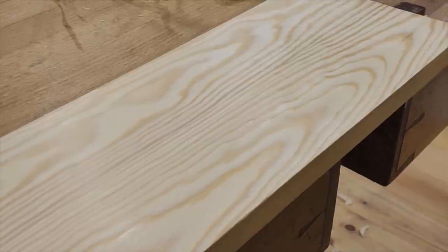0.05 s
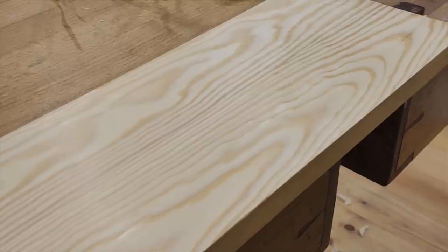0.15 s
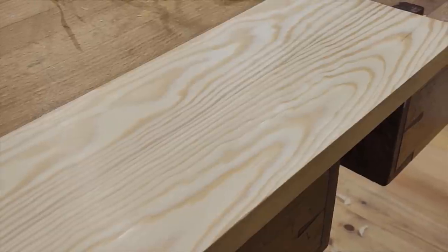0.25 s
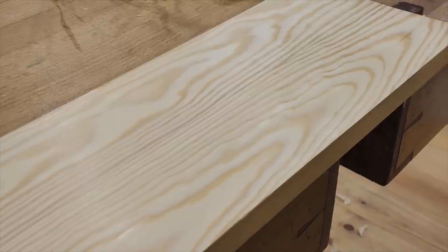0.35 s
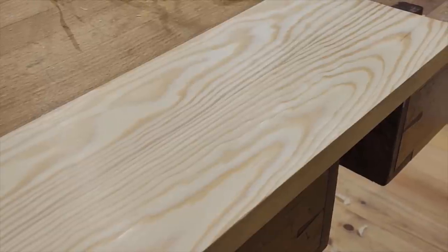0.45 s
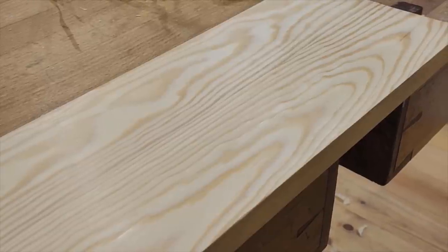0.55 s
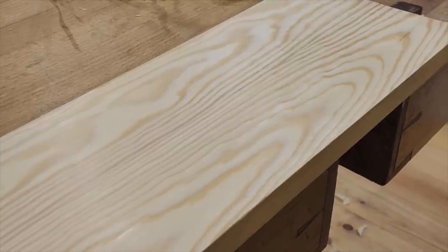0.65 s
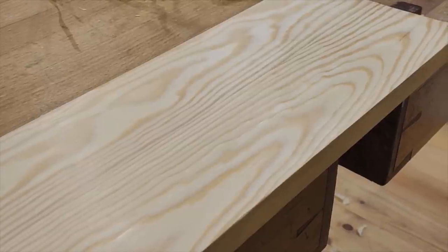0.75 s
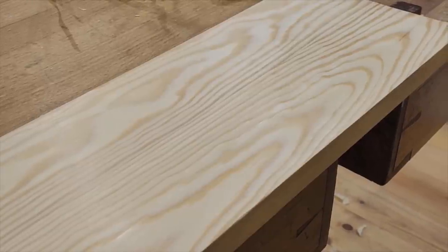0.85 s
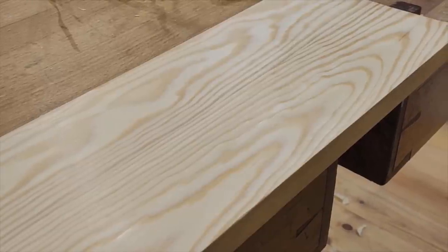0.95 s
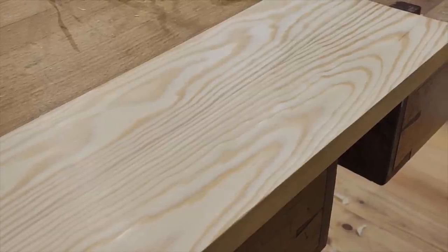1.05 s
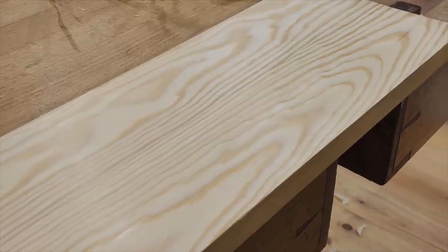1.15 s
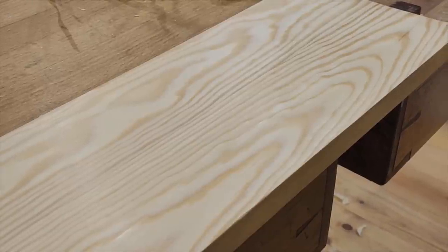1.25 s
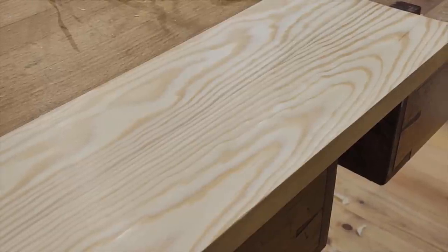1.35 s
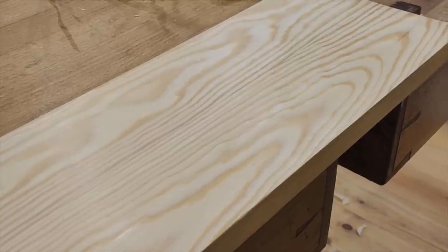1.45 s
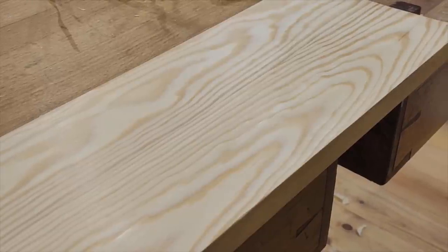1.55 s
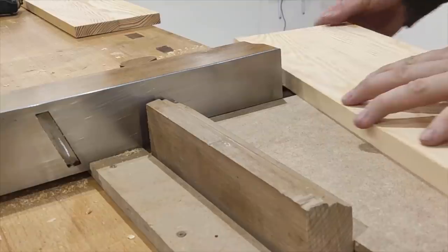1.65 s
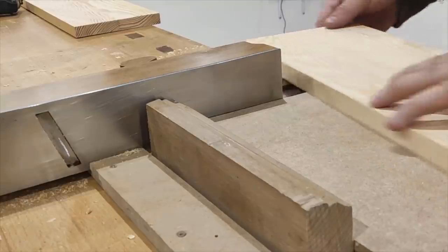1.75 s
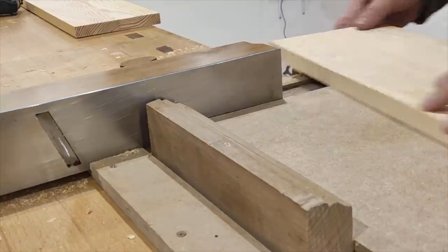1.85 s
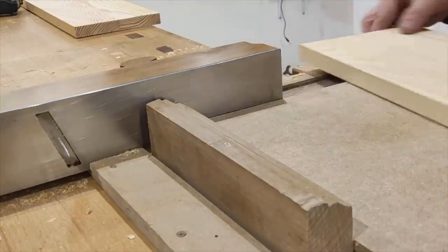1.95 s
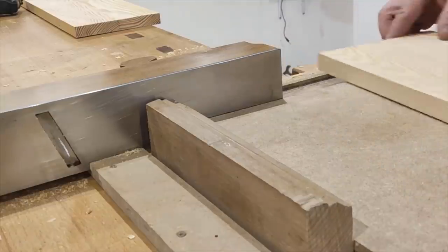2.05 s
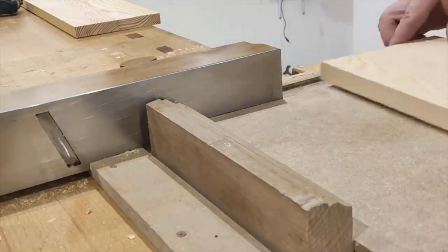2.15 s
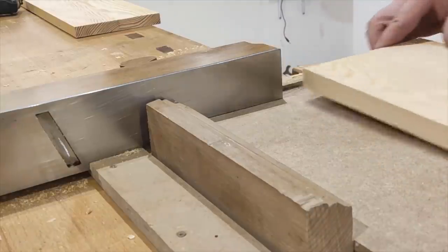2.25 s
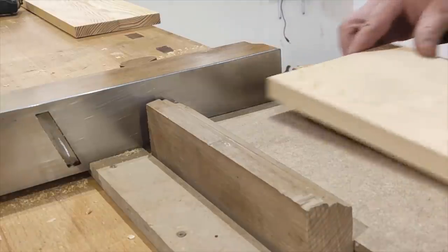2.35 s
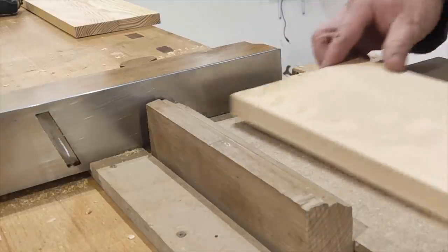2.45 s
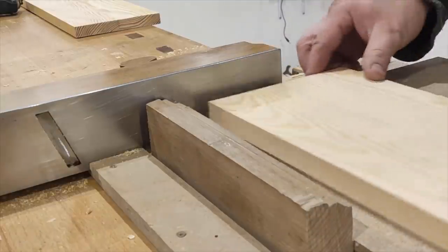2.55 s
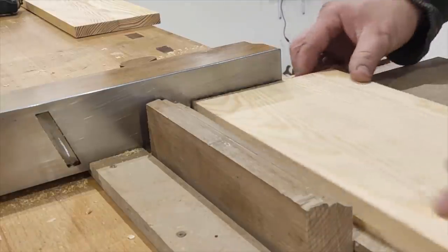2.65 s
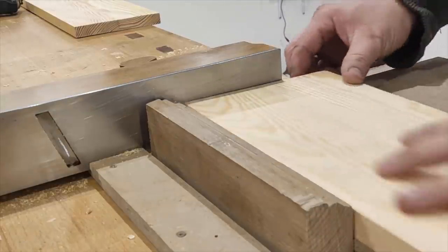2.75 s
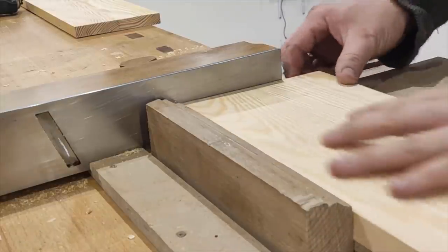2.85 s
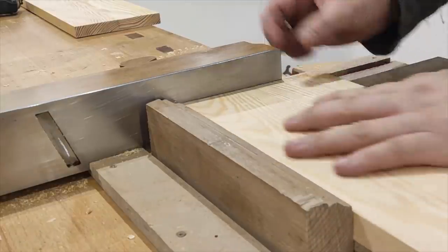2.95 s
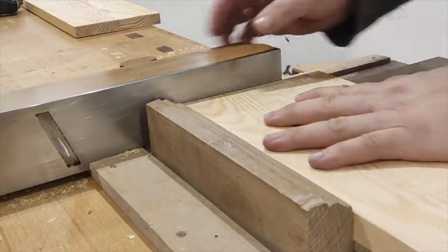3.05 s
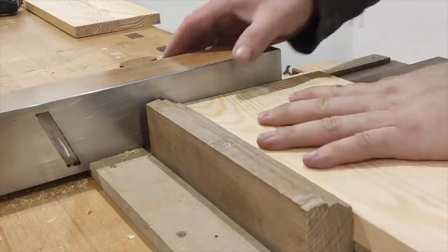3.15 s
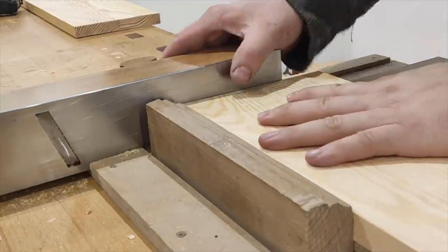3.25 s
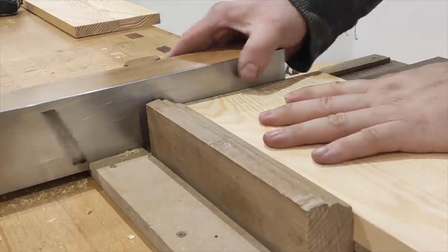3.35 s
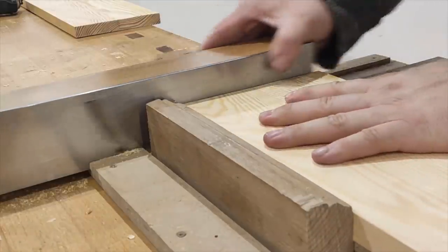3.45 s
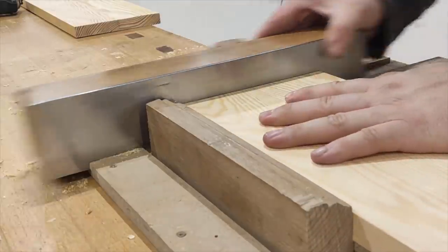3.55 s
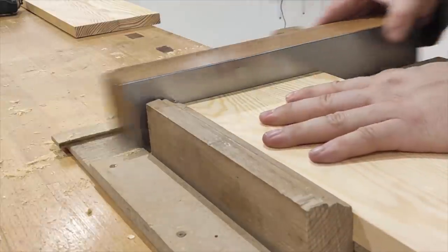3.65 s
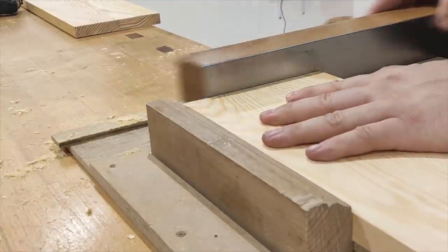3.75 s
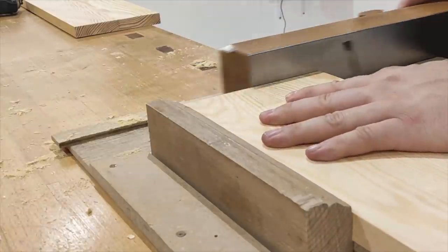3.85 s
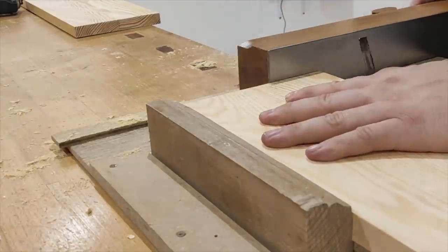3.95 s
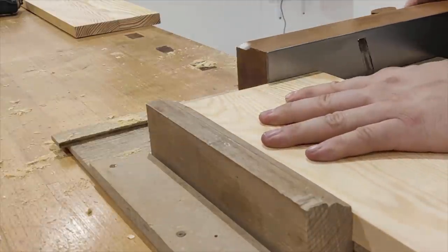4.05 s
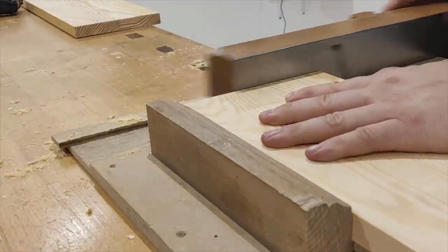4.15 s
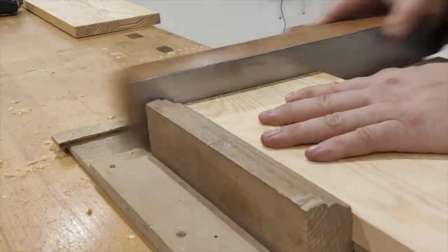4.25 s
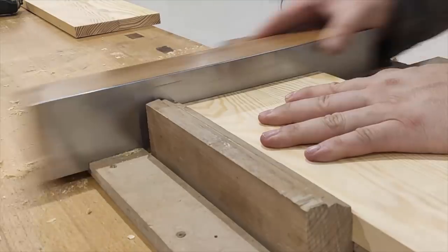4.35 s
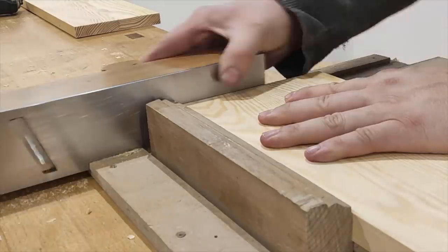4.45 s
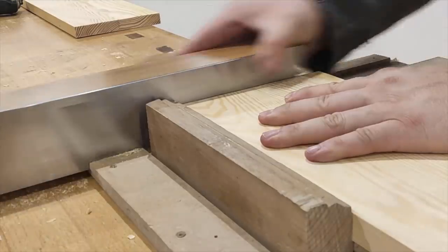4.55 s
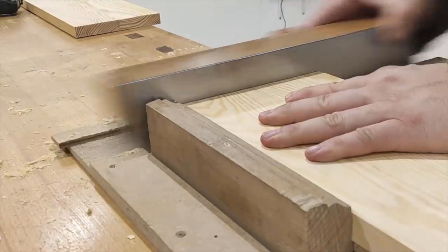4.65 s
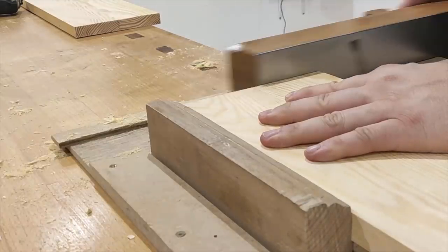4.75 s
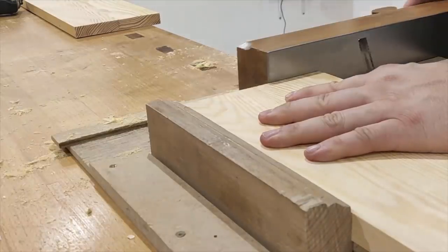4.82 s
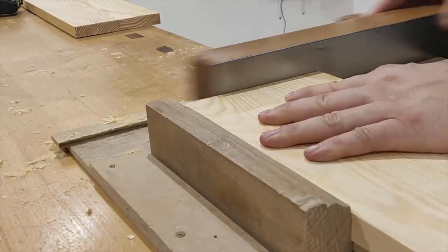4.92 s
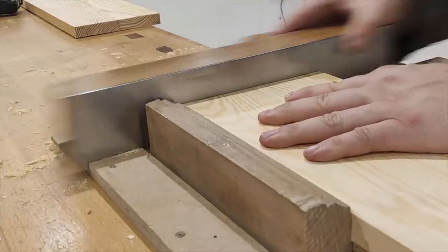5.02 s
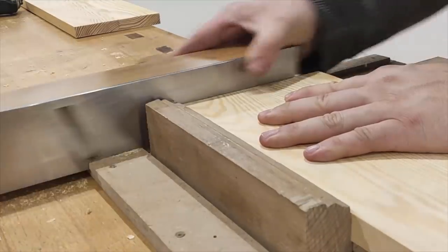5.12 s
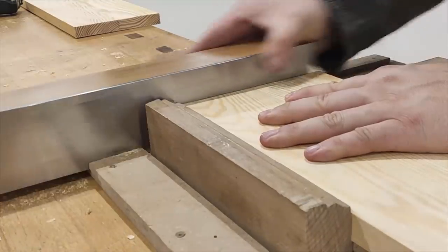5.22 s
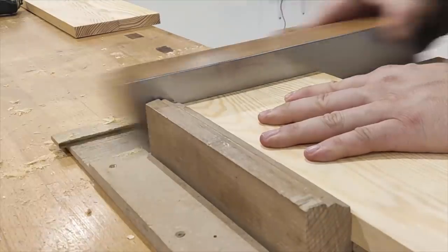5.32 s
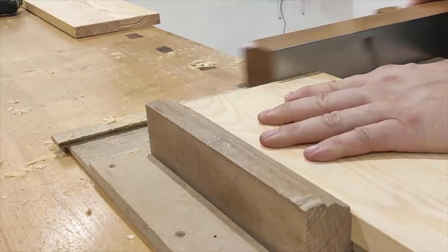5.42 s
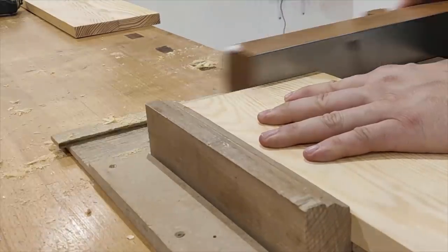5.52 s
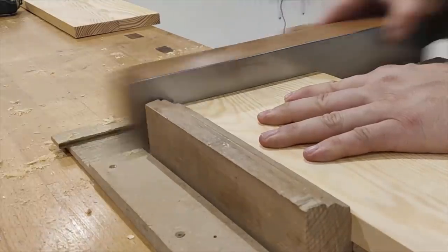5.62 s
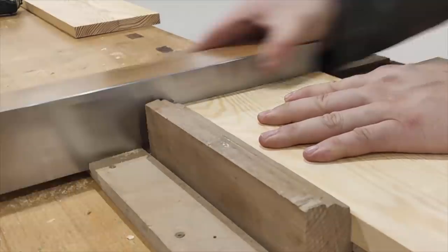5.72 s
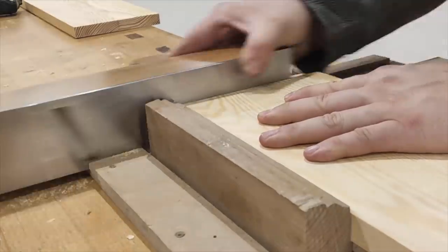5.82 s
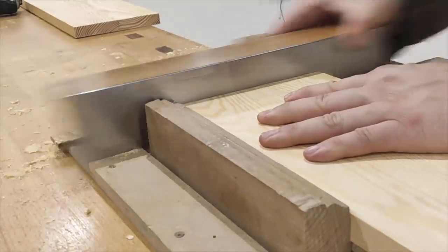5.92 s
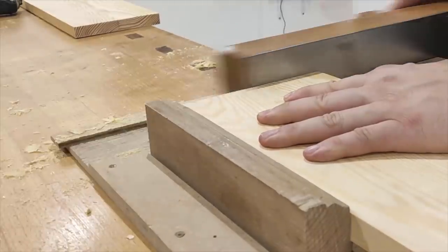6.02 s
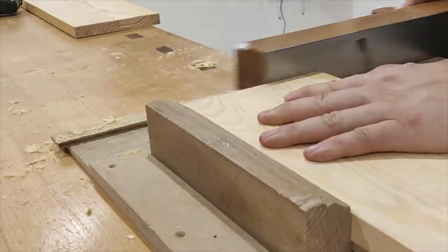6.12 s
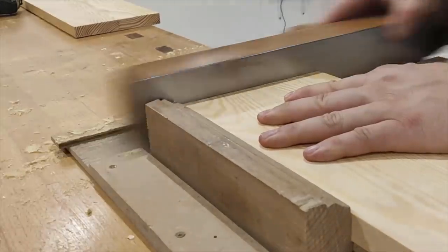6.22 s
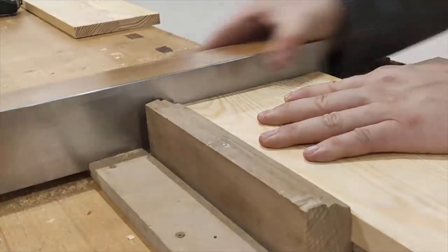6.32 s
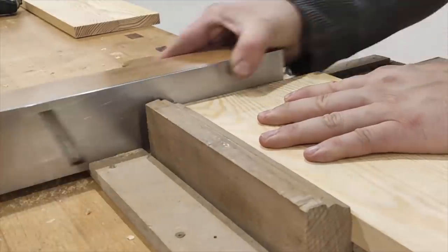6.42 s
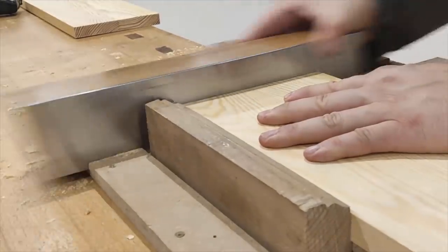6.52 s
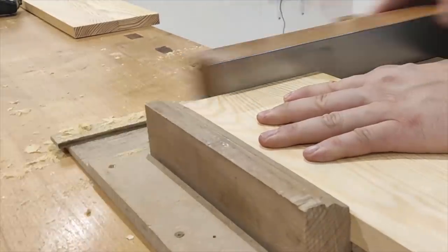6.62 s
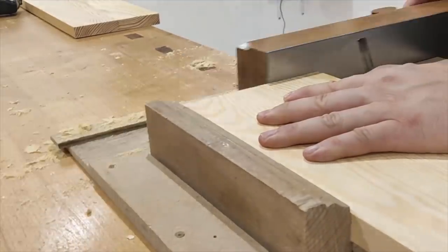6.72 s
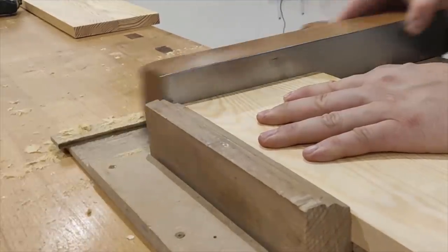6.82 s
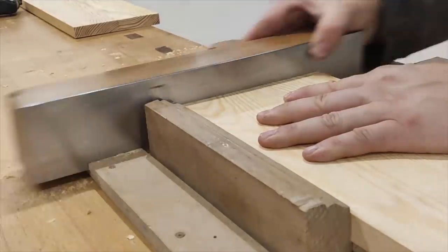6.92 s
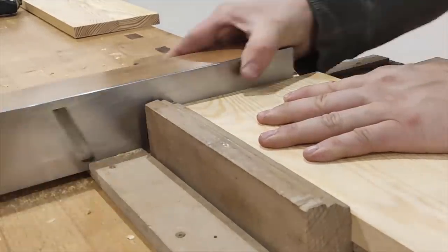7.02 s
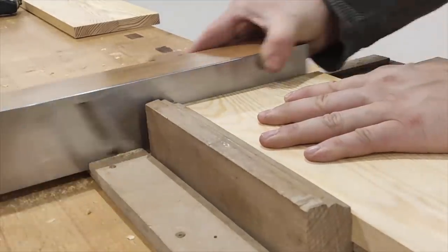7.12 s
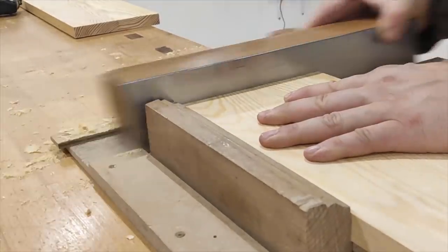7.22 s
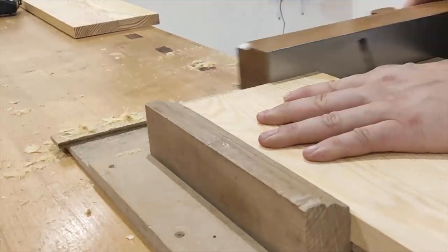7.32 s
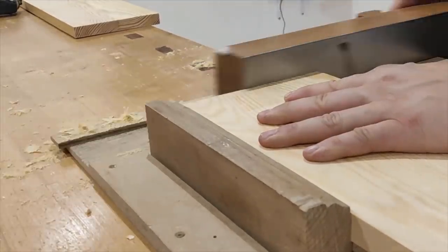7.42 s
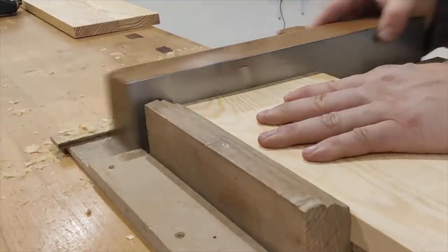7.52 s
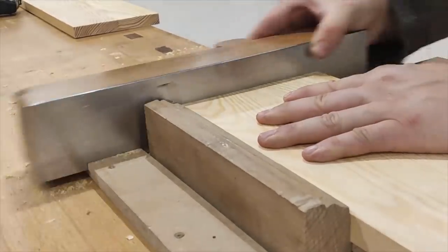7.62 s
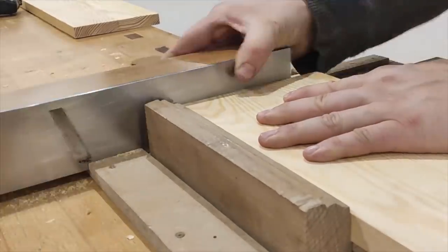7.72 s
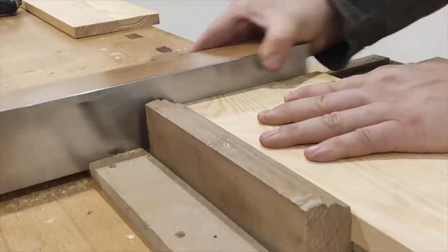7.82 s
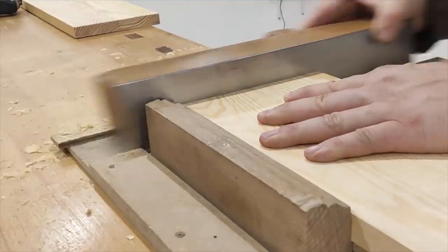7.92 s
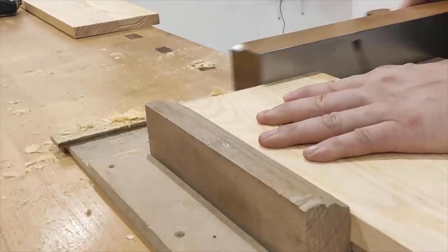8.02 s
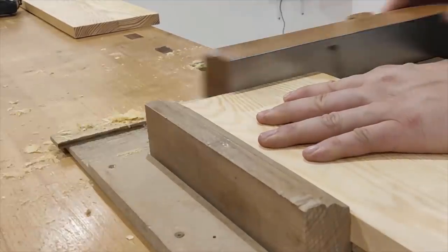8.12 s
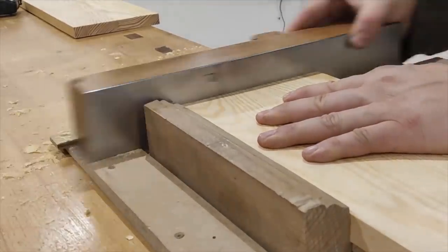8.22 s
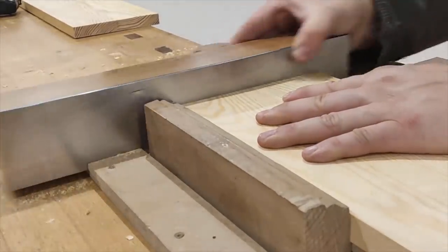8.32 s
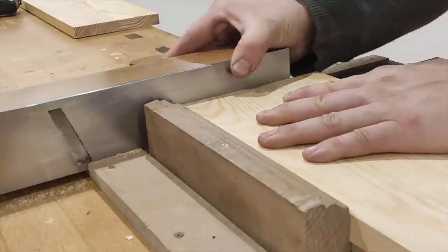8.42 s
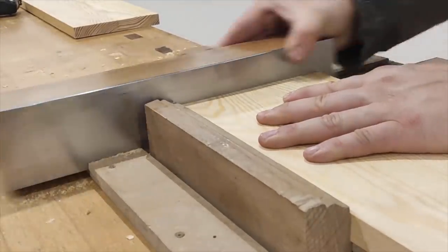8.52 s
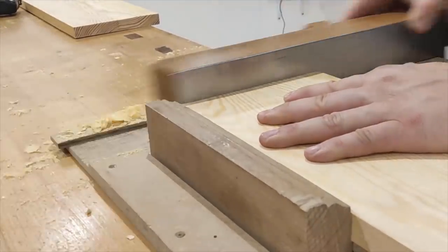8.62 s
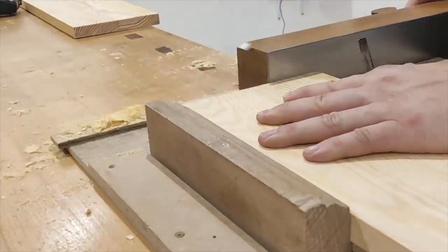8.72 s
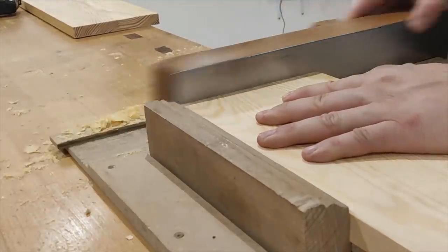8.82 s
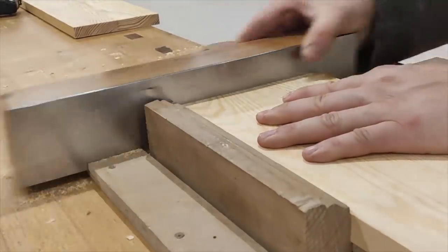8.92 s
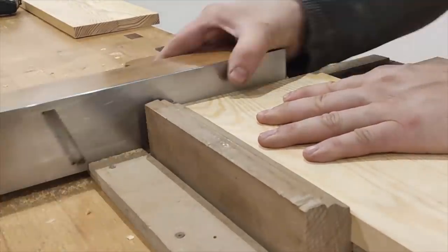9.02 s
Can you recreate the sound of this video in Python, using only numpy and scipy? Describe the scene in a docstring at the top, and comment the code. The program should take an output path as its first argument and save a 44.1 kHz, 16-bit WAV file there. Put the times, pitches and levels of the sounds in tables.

```python
"""A small workshop, saw and board close, in stereo: low rumble, mains hum and fan tones in still air.
First a board lands on the bench and slides to the fence of a bench hook: grains of friction, knocks of wood.
Then a back saw sets off: on each pull its teeth skate back and modes of the blade ring; on each push
a train of tooth snaps and tearing noise excites saw and board and shakes the bench.
Between strokes the blade rubs in the kerf and the hook rattles, until the last push runs out."""
import sys
import numpy as np
from scipy import signal
from scipy.fft import rfft, irfft
from scipy.io import wavfile
from scipy.ndimage import uniform_filter1d, minimum_filter1d

SR = 44100
rng = np.random.default_rng(int(sys.argv[2]) if len(sys.argv) > 2 else 0)


def store_pcm(level_fs):
    """Save levels as 16-bit WAV."""
    pcm = np.round(np.clip(level_fs, -1, 1) * 32767).astype(np.int16)
    wavfile.write(sys.argv[1], SR, np.atleast_2d(pcm).T)


N = 399987
T = np.arange(N) / SR

# Levels in the tables are relative: each layer has its own gain and colour on top.
# tones of mains hum and fan: pitch_hz, level_db
HUM_TONES = [(100, -57.5), (200, -59.5), (246, -65), (601, -80), (625, -70.5), (1966, -74.5)]
# colour of the workshop air: pitch_hz, level_db
AIR_COLOUR = [(15, -2.5), (36, 2.5), (55, -13.5), (150, -12), (300, -15.5), (450, -21.5), (700, -21),
              (1200, -31.5), (2000, -30.5), (4000, -37), (6500, -42.5), (8500, -58), (11000, -48.5),
              (16000, -45)]
AIR_DB = -51.5
ROOM_BASS_T60_S, ROOM_TREBLE_T60_S = 0.63, 0.28

# the board's weight lands on the bench top: start_s, thrum_db, sway_db
BOARD_LANDING = (1.664, -38.5, -44.5)
# board and fingers sliding: time_s, scrape_db, hiss_db
BOARD_SLIDE = [(1.68, -50, -62), (1.788, -43, -62), (1.932, -41, -53.5), (2.204, -46, -61),
               (2.314, -41.5, -51.5), (2.362, -36.5, -52.5), (2.65, -43, -64), (2.688, -45, -56),
               (3.012, -58, -53), (3.14, -55.5, -62.5)]
SLIDE_START_S, SLIDE_END_S = 1.664, 3.22
# the board knocking on hook and fence: start_s, level_db, softness_hz (low-pass corner of the contact)
BOARD_KNOCKS = [(1.664, -39, 2500), (1.694, -35, 1000), (2.575, -30.5, 1200), (2.599, -30.5, 2000),
                (2.745, -26, 1390), (2.784, -34, 700), (2.86, -33.5, 900), (2.91, -34.5, 1000),
                (3.502, -35.5, 6000), (3.823, -26.5, 380), (4.721, -36, 4000), (5.903, -34, 2500),
                (7.042, -29.5, 895)]
# the hook shifts on the bench: start_s, length_s, level_db
HOOK_SCUFFS = [(3.159, 0.041, -46), (3.275, 0.099, -44.5), (5.786, 0.059, -35.5), (6.42, 0.075, -40.5),
               (7.038, 0.044, -36), (7.155, 0.033, -42), (8.422, .09, -44)]

# the first pull and push are slow and feel for the line, when each sets off: start_s
FIRST_TURNS_S = [3.25, 3.98]
# the saw turns round this long before its teeth engage
PUSH_RUN_UP_S, PULL_RUN_UP_S = .07, 0.13
LAST_TURN_S = 9.2  # the last push runs out
# the arm's effort as the sawing gets under way: time_s, effort_db
ARM_EFFORT = [(3.3, -4.5), (4.3, -5.5), (5.5, 0.5), (9, 0.5)]
# pull strokes: start_s (teeth catch), swell_s, catch_db, drag_db, peak_db (hardest contact), treble_db,
# ring_hz, ring_db, bench_shake_db, rise_s (from the catch to the hardest contact)
PULL_STROKES = [(3.797, 0.017, -42, -37.5, -34, -20, 2097, -41.5, -47, 0.019),
                (4.672, 0.0022, -35, -43, -17, -6.5, 2396, -23.5, -46, .088),
                (5.334, 0.0076, -31.5, -42.5, -18.5, 3.5, 2540, -22.5, -40, 0.081),
                (5.964, .016, -26, -48, -21, 4, 2600, -31, -36.5, .088),
                (6.586, 0.017, -22.5, -46, -20.5, 4, 2365, -27, -34.5, 0.087),
                (7.243, 0.014, -25, -32, -18.5, 2.5, 2336, -23, -34.5, .087),
                (7.947, .013, -29, -24.5, -23, 1, 2130, -21.5, -36.5, .088),
                (8.616, 0.041, -26, -27, -24, 3, 2430, -33, -31.5, 0.09)]
# push strokes: start_s (teeth bite), bite_s (length), bite_db, cut_s (length), cut_db,
# cut_treble_db, woody_body_db, bench_sway_db, bench_shake_db
PUSH_STROKES = [(4.248, 0.015, -19.5, 0.025, -24, -13, 4, -42.5, -45),
                (4.984, 0.021, -17, .058, -24, -0.5, 6, -35.5, -39.5),
                (5.619, 0.01, -13.5, 0.062, -23.5, 0.5, 1.5, -32, -35),
                (6.232, 0.028, -15.5, 0.063, -25.5, 9.5, 5, -27.5, -29),
                (6.85, 0.024, -13.5, 0.088, -19.5, 1.5, -1, -29.5, -31),
                (7.512, 0.023, -16, 0.18, -22.5, 5, 3, -32, -33.5),
                (8.199, 0.035, -11, 0.13, -24, 12, 3, -38, -31),
                (8.864, 0.011, -8.5, 0.092, -24, 11.5, 0.5, -34, -32)]
# the teeth snag once more near the end of a push: start_s, length_s, level_db
PUSH_SNAGS = [(5.095, 0.0071, -29), (5.727, 0.0069, -15), (6.326, 0.0093, -18.5), (6.959, 0.02, -19),
              (7.645, 0.028, -20.5), (8.28, 0.026, -23)]

# colours of bench sway, bench-top thrum and hook rattle: pitch_hz, level_db
SWAY_COLOUR = [(15, -18), (35, -17.5), (50, 4.5), (66, -1), (90, -9), (200, -51.5)]
THRUM_COLOUR = [(70, -29), (120, -1.5), (170, 1), (215, -5.5), (290, -5), (400, -18), (800, -50)]
HOOK_COLOUR = [(150, -18.5), (350, -4), (480, 6), (640, -0.5), (900, -1), (1200, -4), (1700, -19),
               (3000, -37)]
# colours of board scrape, kerf rub, skating pull and cutting push: pitch_hz, level_db
BOARD_COLOUR = [(120, -41), (200, -15), (409, -26), (465, -11), (763, -10.5), (968, 1), (1300, -3.5),
                (1450, -1), (1680, -1), (5940, -8), (8420, -25), (13800, -31), (16000, -32)]
KERF_COLOUR = [(150, -29.5), (500, -4.5), (1200, -7.5), (2500, -9.5), (4500, -12), (6500, -13.5),
               (8500, -23), (11000, -22.5), (16000, -27.5)]
SKATE_COLOUR = [(70, -21), (140, -6.5), (450, 1.5), (700, -13), (1150, -4.5), (1500, 5), (1800, 0),
                (2500, 5), (3300, -2.5), (4300, 0), (6500, -9.5), (8500, -19), (11000, -17.5), (16000, -27)]
CUT_COLOUR = [(71, -50.5), (120, -7.5), (157, -11.5), (278, -6.5), (727, -12.5), (1400, 0), (2640, -3),
              (2930, -1), (3450, -5.5), (4320, 0), (5080, -4.5), (6500, -7.5), (8480, -15.5),
              (10600, -11.5), (16000, -18)]
# colours of the slide's hiss, the knocks and their thud: pitch_hz, level_db
HISS_COLOUR = [(1000, -7.5), (6000, 3.5), (8500, -6.5), (11000, -4), (16000, -11)]
KNOCK_COLOUR = [(60, -11), (250, 1.0), (700, 5.5), (1500, -2.5), (5000, -3), (16000, -35)]
THUD_COLOUR = [(100, -20), (200, 0), (380, -7.5), (800, -32.5)]
# resonances of the scraped board and the thud: pitch_hz, width_hz, level_db
SCRAPE_MODES = [(664, 50, 7.5), (940, 73, -9), (1444, 24, 7), (1600, 92, -3.5)]
THUD_MODES = [(276.5, 8.1, 15.4), (365, 31, 8.4)]
# resonances of the board on its hook: pitch_hz, width_hz, level_db
BOARD_MODES = [(165, 12, 6), (266.4, 15, 5.5), (337, 51, 6.5), (470, 54, -13.5), (705, 81, 0.5),
               (914, 27, -48), (1460, 81, 5)]
# resonances of saw and board under the teeth: pitch_hz, width_hz, level_db
SAW_MODES = [(165, 18, 6.5), (275, 11, -2), (492, 23, -24), (856, 175, 2), (1474, 105, -6.5), (2155, 88, 0),
             (2970, 480, -6), (3280, 72, -3), (3590, 82, -2), (4210, 104, -3), (4690, 150, -12),
             (5500, 150, -8), (6410, 480, -6), (6700, 170, -8)]
# outer modes of the blade: pitch_hz (before bend and flutter), level_db, t60_s
OUTER_BLADE_MODES = [(1500, 0, 0.11), (3140, 0, 0.2)]
BLADE_LONGEST_T60_S = .4  # in the central cluster
TOP_HZ = 16000


def undb(db):
    """Decibels to gain."""
    return 10 ** (np.asarray(db) / 20)


def unit(x):
    """Scale to rms 1."""
    return x / np.sqrt(np.mean(x ** 2))


def curve(rows, axis=1):
    """Gain over time from a column of dB values."""
    rows = np.array(rows)
    return undb(np.interp(T, rows[:, 0], rows[:, axis]))


def walk(rate_hz):
    """Slow random wander with rms 1."""
    knots = rng.standard_normal(int(N / SR * rate_hz) + 2)
    return unit(np.interp(T * rate_hz, np.arange(len(knots)), knots))


def envelope(start, hold, attack_s, release_s):
    """Straight attack, exponential release beginning at the hold time, counted from the start."""
    out, i = np.zeros(N), int(start * SR)
    t = T[:min(N - i, SR)]
    out[i:i + len(t)] = np.minimum(t / attack_s, 1) * np.exp(-np.maximum(t - hold, 0) / release_s)
    return out


def lowpass(x, hz, order=2):
    """Butterworth low-pass."""
    return signal.sosfilt(signal.butter(order, min(hz, .45 * SR), fs=SR, output="sos"), x)


def ring(x, response):
    """Pass a sound through a response."""
    return signal.oaconvolve(np.atleast_2d(x), np.atleast_2d(response), axes=1)[:, :N]


def body(colour, modes=(), size=8192):
    """Causal response of unit energy: resonances standing on a broad colour."""
    f = np.arange(size // 2 + 1) * SR / size + 1
    hz, db = np.transpose(colour)
    gain = undb(np.interp(np.log(f), np.log(hz), db))
    gain = gain * np.sqrt(1 + sum(undb(d) ** 2 / (1 + (2 * (f - c) / w) ** 2) for c, w, d in modes))
    # folding the cepstrum gives minimum phase
    cepstrum = irfft(np.log(gain))
    cepstrum[1:size // 2] *= 2
    cepstrum[size // 2 + 1:] = 0
    h = irfft(np.exp(rfft(cepstrum)))
    return h / np.linalg.norm(h)


def spread(x, split_hz=900):
    """Turn middle and side into left and right; bass reaches both alike, treble comes by unlike paths."""
    side = x[1] - lowpass(x[1], split_hz, order=1)
    return np.array([x[0] + side, x[0] - side]) / np.sqrt(2)


def grains(rate, spread_db):
    """Tiny slips and snaps at random moments (rate per second), random in size and unlike in two channels."""
    sizes = undb(spread_db * np.minimum(rng.exponential(size=N), 4))
    return unit((rng.random(N) < rate / SR) * sizes * rng.standard_normal((2, N)))


def background():
    """Still workshop air as coloured noise with a low rumble, and steady hum tones with wandering phase."""
    air = unit(spread(ring(rng.standard_normal((2, N)), body(AIR_COLOUR))))
    hum = sum(undb(db) * np.sqrt(2) * np.sin(2 * np.pi * hz * T + 0.27 * walk(8.5)) for hz, db in HUM_TONES)
    return undb(AIR_DB) * air + hum


def room(x, wet_db=-9, delay_s=0.01):
    """The workshop's walls return a short tail whose treble dies first."""
    t = T[:SR * 3 // 4]
    noise = rng.standard_normal((2, len(t)))
    low = lowpass(noise, 1800, order=1)
    tail = low * undb(-60 * t / ROOM_BASS_T60_S)
    tail += undb(-2.0) * (noise - low) * undb(-60 * t / ROOM_TREBLE_T60_S)
    tail = (tail - lowpass(tail, 310, order=1)) * (1 - np.exp(-(t / delay_s) ** 2))
    return undb(wet_db) * ring(x, tail / np.sqrt(np.sum(tail ** 2) / 2))


def travel(turn_db=-17):
    """Speed of the saw: it swells through each stroke and nearly stops at each turn."""
    turns = FIRST_TURNS_S + [row[0] - PUSH_RUN_UP_S for row in PUSH_STROKES[1:]]
    turns += [row[0] - PULL_RUN_UP_S for row in PULL_STROKES[1:]]
    turns = sorted(turns + [LAST_TURN_S])
    speed = np.abs(np.sin(np.pi * np.interp(T, turns, np.arange(len(turns)))))
    return (speed ** 0.63 + undb(turn_db)) * (T > turns[0])


def sliding(axis=1):
    """Strength of the board's slide from touch-down until it rests at the fence."""
    touch_down = np.clip((T - SLIDE_START_S) / 0.0055, 0, 1)
    come_to_rest = np.clip((SLIDE_END_S - T) / 0.1, 0, 1)
    return touch_down * come_to_rest * curve(BOARD_SLIDE, axis)


def shaking(push_db, pull_db, knock_db, slide_db, travel_db, attack_s, release_s):
    """Drive of a bench part: bites, catches and knocks die away over the steady drag of saw and board."""
    blows = [(s, cut_s, db + push_db) for s, _, _, cut_s, *_, db in PUSH_STROKES]
    blows += [(s, rise, db + pull_db) for s, *_, db, rise in PULL_STROKES]
    power = sum((undb(db) * envelope(s, hold, attack_s, release_s)) ** 2 for s, hold, db in blows)
    power += sum((undb(db + knock_db) * envelope(s, 0, attack_s, release_s / 2)) ** 2
                 for s, db, _ in BOARD_KNOCKS)
    slide = undb(slide_db) * sliding()
    drag = undb(travel_db) * travel() * curve(ARM_EFFORT)
    return np.sqrt(power + slide ** 2 + drag ** 2)


def swaying(hold_s=0.11, attack_s=0.0088, release_s=.08, slide_db=-14, knock_db=-14, rocking_db=-43):
    """Pushes set the bench swaying; knocks nudge it, the working arm and the sliding board keep it rocking."""
    power = sum((undb(db) * envelope(s, hold_s, attack_s, release_s)) ** 2 for s, *_, db, _ in PUSH_STROKES)
    power += sum((undb(db + knock_db) * envelope(s, 0, attack_s, 0.14)) ** 2 for s, db, _ in BOARD_KNOCKS)
    slide = undb(slide_db) * sliding()
    rocking = undb(rocking_db) * curve(ARM_EFFORT) ** 2.0 * (T > FIRST_TURNS_S[0])
    return np.sqrt(power + slide ** 2 + rocking ** 2)


def bench(sway_side_db=-10, uneven_db=2.5, pan_db=1.0):
    """The heavy bench sways under the strokes, its top thrums, the hook rattles and scuffs on it in fits."""
    lands_s, lands_thrum_db, lands_sway_db = BOARD_LANDING
    sway = ring(rng.standard_normal((2, N)), body(SWAY_COLOUR, [(51, 11, 5.2)]))
    sway = sway / np.sqrt(uniform_filter1d(sway ** 2, SR // 16))  # even out the noise's own swells
    side = undb(sway_side_db) * np.array([sway[1], -sway[1]])
    sway = undb([[-3], [1.5]]) * (sway[0] + side)
    landing_sway = undb(lands_sway_db) * envelope(lands_s, 0.37, attack_s=.01, release_s=0.17)
    sway *= np.hypot(swaying(), landing_sway)

    thrum = ring(grains(rate=2400, spread_db=0.5), body(THRUM_COLOUR, BOARD_MODES))
    landing_thrum = undb(lands_thrum_db) * envelope(lands_s, 0, attack_s=.006, release_s=0.14)
    thrum *= np.hypot(landing_thrum, shaking(push_db=-0.5, pull_db=-0.5, knock_db=-10.5, slide_db=-20,
                                             travel_db=-44, attack_s=0.0083, release_s=0.1))

    rattle = ring(grains(rate=1100, spread_db=1.5), body(HOOK_COLOUR, BOARD_MODES))
    rattle *= undb(uneven_db * walk(28))
    scuffs = sum(undb(db) * envelope(s, length, attack_s=length / 2, release_s=0.042)
                 for s, length, db in HOOK_SCUFFS)
    rattle *= np.hypot(scuffs, shaking(push_db=0, pull_db=-3.5, knock_db=-8, slide_db=-9.5,
                                       travel_db=-47.5, attack_s=0.0049, release_s=0.087))
    pan = undb([[-pan_db / 2], [pan_db / 2]])
    return sway + pan * spread(undb(0.5) * thrum + undb(-0.5) * rattle)


def knocks(crack_s=0.0089, crack_db=-25, thud_db=-4):
    """Wood meets wood: one blow and a short scuff ring the board, and its low bending modes thud on."""
    blows, t = np.zeros((2, N)), T[:SR // 10]
    for s, db, soft_hz in BOARD_KNOCKS:
        blow = undb(crack_db) * rng.standard_normal((2, len(t))) * np.exp(-t / crack_s)
        blow[0, 0] += 1
        i = int(s * SR)
        blows[:, i:i + len(t)] += undb(db) * lowpass(blow, soft_hz)
    thud = body(THUD_COLOUR, THUD_MODES)
    return undb(25.5) * spread(ring(blows, body(KNOCK_COLOUR, BOARD_MODES) + undb(thud_db) * thud))


def handling(scrape_db=4.5, hiss_db=8, rub_db=-42, rub_effort=0.59):
    """The board slides with a scrape and fine hiss; the blade rubs in the kerf, following the saw's speed."""
    scrape = grains(rate=11000, spread_db=0.0) * sliding() * undb(0.84 * walk(29.55))
    scrape = ring(scrape, body(BOARD_COLOUR, SCRAPE_MODES))
    hiss = ring(grains(rate=12000, spread_db=1.0) * sliding(axis=2), body(HISS_COLOUR))
    rub = grains(rate=9000, spread_db=-1.5) * travel() * curve(ARM_EFFORT) ** rub_effort
    rub = ring(rub * undb(0.93 * walk(35)), body(KERF_COLOUR))
    return spread(undb(scrape_db) * scrape + undb(hiss_db) * hiss + undb(rub_db) * rub)


def teeth(rate_hz, jitter, uneven_db, tear, snap_db, grain_db):
    """Each tooth snaps a fibre and tears on until the next strikes; the grain varies the force at random."""
    phase = np.cumsum(rate_hz * np.exp(jitter * walk(200))) / SR
    tooth = phase.astype(int)
    size = undb(uneven_db * np.clip(rng.standard_normal(N), -2, 2))[tooth] * undb(grain_db * walk(170))
    snaps = np.diff(tooth, prepend=0) * size * rng.choice([-1, 1], (2, N))
    # tear is the decay as a fraction of the interval between teeth
    tearing = np.exp(-(phase % 1) / tear) * size * rng.standard_normal((2, N))
    return unit(unit(tearing) + undb(snap_db) * unit(snaps))


def dispersion():
    """Bending waves carry treble faster than bass, so every snap becomes a tiny chirp."""
    f = np.linspace(0, SR / 2, 257)
    delay_s = .0002 + .0013 * np.exp(-f / 6000)
    return irfft(np.exp(-2j * np.pi * np.cumsum(delay_s) * f[1]))


def saw_body(x, colour, shift_db=7.5, shift_hz=36):
    """As the cut travels along the blade, the drive of each resonance shifts at random."""
    x = ring(x, signal.fftconvolve(body(colour, size=4096), dispersion()))
    out = x.copy()
    moments = np.arange(0, T[-1] + .1, 1 / shift_hz)
    for hz, width, db in SAW_MODES:
        gains = undb(db + shift_db * np.clip(rng.standard_normal(len(moments)), -2, 1.5))
        out += signal.lfilter(*signal.iirpeak(hz, hz / width, fs=SR), x * np.interp(T, moments, gains))
    return spread(out)


def blade(centre_hz, spacing_hz=86, width_hz=330, damping_hz=650, count=15, bend=0.0598, relax_s=.05,
          waver=0.0047):
    """Close bending modes of the steel plate; they flutter, and sag as the flexed blade straightens."""
    t = T[:SR // 3]
    offset = spacing_hz * (np.arange(count) - count // 2 + 0.277 * rng.standard_normal(count))
    # modes die sooner the further they lie from one spacing below the centre
    cluster = [(centre_hz + d,
                -20 * np.log10(1 + (d / width_hz) ** 2),
                BLADE_LONGEST_T60_S / (1 + ((d + spacing_hz) / damping_hz) ** 2)) for d in offset]
    hz, db, t60_s = np.transpose(cluster + OUTER_BLADE_MODES)[:, :, None]
    flutter = waver * np.sin(2 * np.pi * (22 * t + rng.random((len(hz), 1))))
    cycles = np.cumsum(hz * (1 + bend * np.exp(-t / relax_s) + flutter), axis=1) / SR
    waves = undb(db - 60 * t / t60_s) * np.sin(2 * np.pi * (cycles + rng.random((2, len(hz), 1))))
    return waves.sum(axis=1) / np.sqrt(np.sum(undb(db) ** 2) / 2)


def pull(catch_s=0.0067, release_s=0.0065, early_ring_db=-4):
    """Teeth catch, skate backwards with rising pressure, then let go and leave the blade ringing."""
    skating = teeth(rate_hz=750, jitter=.3, uneven_db=1.5, tear=0.49, snap_db=-10, grain_db=0.0)
    dull = lowpass(skating, 3600, order=1)
    drive, zing = np.zeros((2, N)), np.zeros((2, N))
    for s, swell, catch_db, drag_db, peak_db, treble_db, ring_hz, ring_db, _, rise in PULL_STROKES:
        i = int(s * SR)
        t = T[:min(N - i, SR // 4)]
        span = slice(i, i + len(t))
        before, after = np.maximum(rise - t, 0), np.maximum(t - rise, 0)
        contact = undb(catch_db) ** 2 * np.exp(-(t / catch_s) ** 2)
        contact += undb(drag_db) ** 2
        contact += undb(peak_db) ** 2 * np.exp(-before / swell)
        rasp = dull[:, span] + undb(treble_db) * (skating[:, span] - dull[:, span])
        drive[:, span] += rasp * np.sqrt(contact) * np.exp(-after / release_s)
        # the blade rings at the catch and again just before the hardest contact
        for start, db in ((s, drag_db + early_ring_db), (s + rise - .006, ring_db)):
            j = int(start * SR)
            tone = blade(ring_hz)[:, :N - j]
            n = tone.shape[1]
            zing[:, j:j + n] += undb(db) * tone * (1 - np.exp(-T[:n] / 0.0004))
    return saw_body(drive, SKATE_COLOUR) + undb(3.0) * zing


def push(attack_s=0.0034, release_s=0.0082, bite_release_s=0.0083, crunch_db=13, crunch_s=0.025,
         bite_treble_db=-1, bite_body_db=-2, snag_treble_db=2, snag_body_db=-5, snag_attack_s=0.0048):
    """Teeth dig in with a jolt, cut on through the board and may snag again."""
    cutting = teeth(rate_hz=950, jitter=.2, uneven_db=1.0, tear=0.56, snap_db=-2.5, grain_db=1.0)
    crunch = signal.sosfilt(signal.butter(2, [2700, 4700], "bandpass", fs=SR, output="sos"), cutting)
    woody, dull = lowpass(cutting, 1550, order=1), lowpass(cutting, 5500, order=1)
    low, middle, high, jolt = np.zeros((4, N))
    contacts = [(envelope(s, length, snag_attack_s, release_s) * undb(db), snag_body_db, snag_treble_db)
                for s, length, db in PUSH_SNAGS]
    for s, bite_s, bite_db, cut_s, cut_db, treble_db, body_db, *_ in PUSH_STROKES:
        bite = undb(bite_db) * envelope(s, bite_s, attack_s, bite_release_s)
        cut = undb(cut_db) * envelope(s, cut_s, attack_s, release_s)
        contacts.append((bite, body_db + bite_body_db, bite_treble_db + 0.26 * treble_db))
        contacts.append((cut, body_db, treble_db))
        # the harder the teeth land, the more the blade itself crunches for a moment
        jolt += bite * undb(crunch_db + bite_db) * envelope(s, 0, attack_s, crunch_s)
    # contacts add as power in three bands
    for force, body_db, treble_db in contacts:
        low += (force * undb(body_db)) ** 2
        middle += force ** 2
        high += (force * undb(treble_db)) ** 2
    drive = np.sqrt(low) * woody
    drive += np.sqrt(middle) * (dull - woody)
    drive += np.sqrt(high) * (cutting - dull)
    drive += jolt * crunch
    return undb(-1.53) * saw_body(drive, CUT_COLOUR)


def scene():
    """Saw and board close with the room's tail on them; bench and background without it."""
    near = push() + pull() + handling() + knocks()
    return near + room(near) + bench() + background()


def record(dry, ceiling_db=-2.0):
    """A fast limiter, one gain for both channels, holds down the highest peaks; the top is cut."""
    need = np.minimum(1, undb(ceiling_db) / (np.abs(dry).max(axis=0) + 1e-9))
    gain = uniform_filter1d(minimum_filter1d(need, size=129), size=129)
    return signal.sosfilt(signal.ellip(8, .2, 70, TOP_HZ, fs=SR, output="sos"), dry * gain)


dry = scene()
out = record(dry)
store_pcm(out)
```